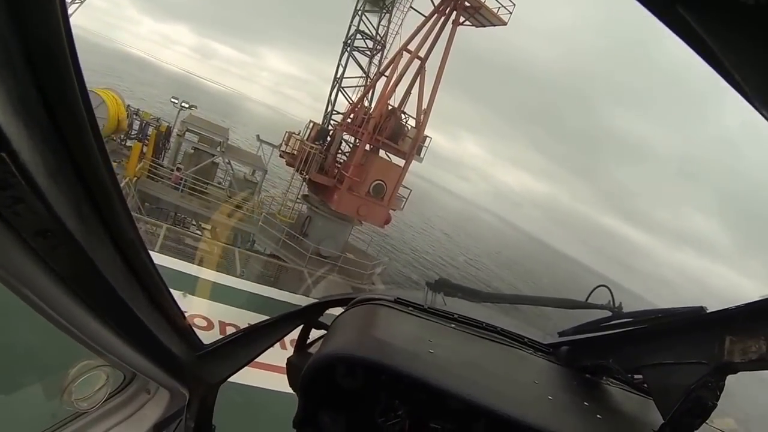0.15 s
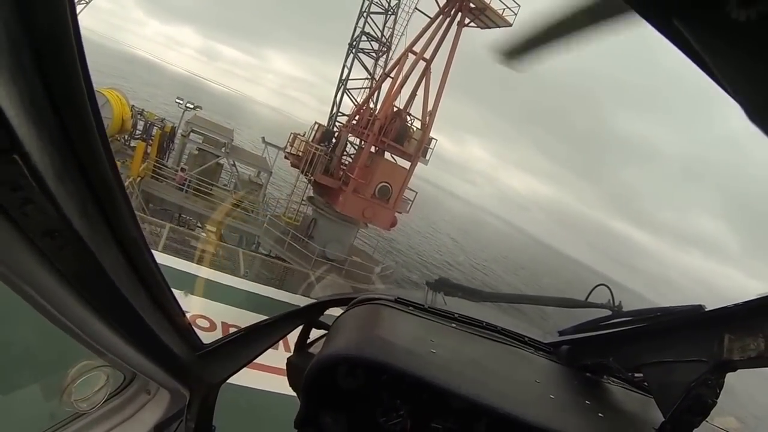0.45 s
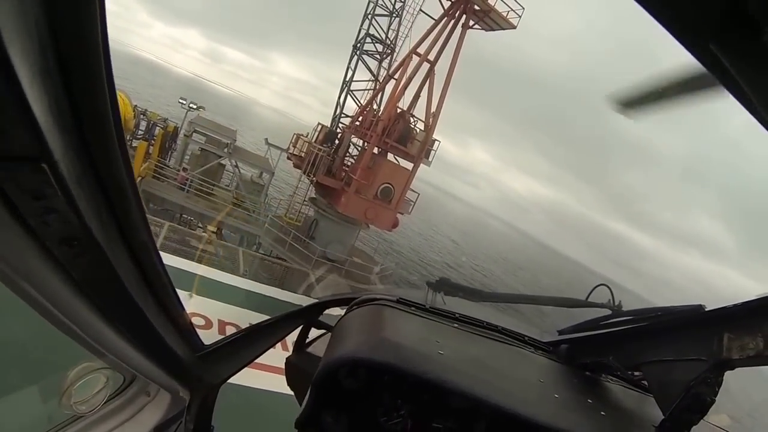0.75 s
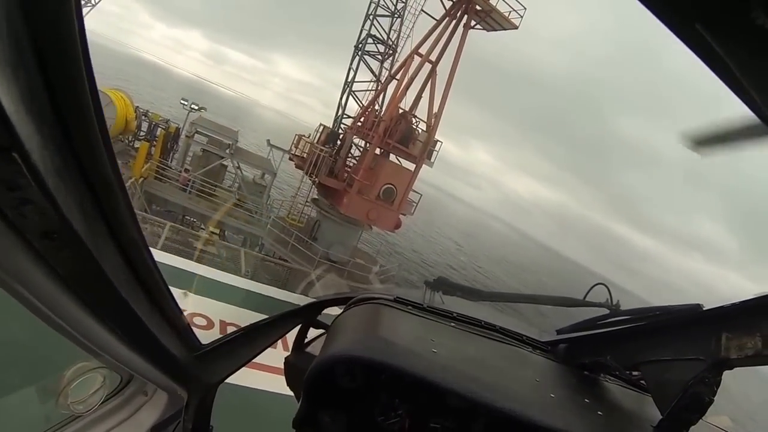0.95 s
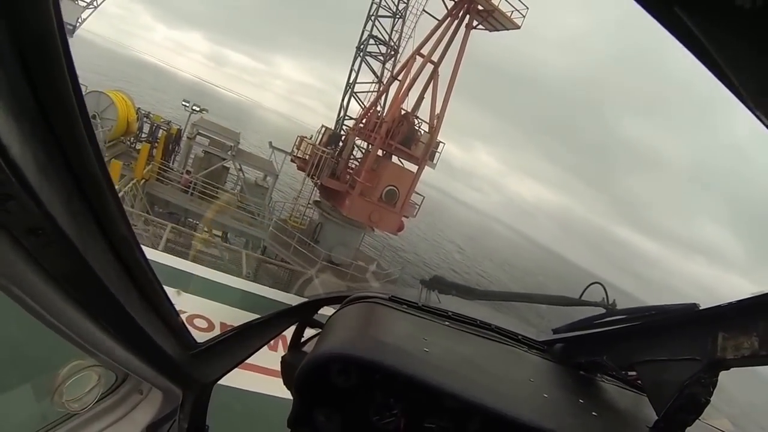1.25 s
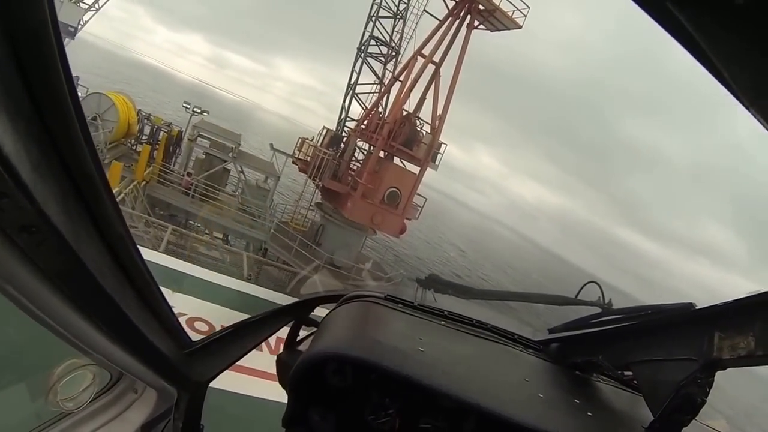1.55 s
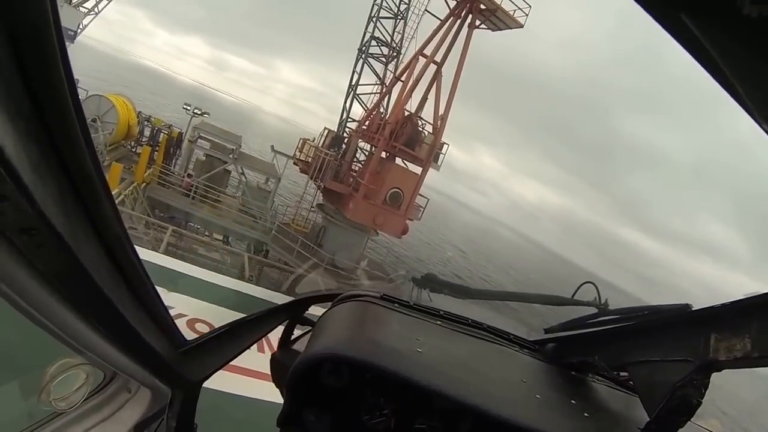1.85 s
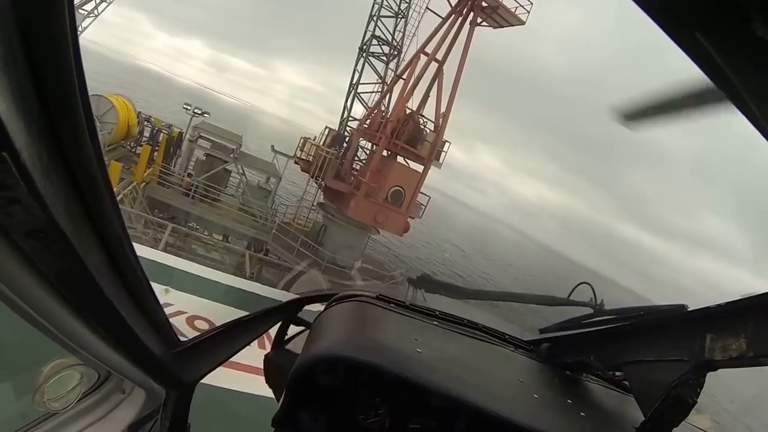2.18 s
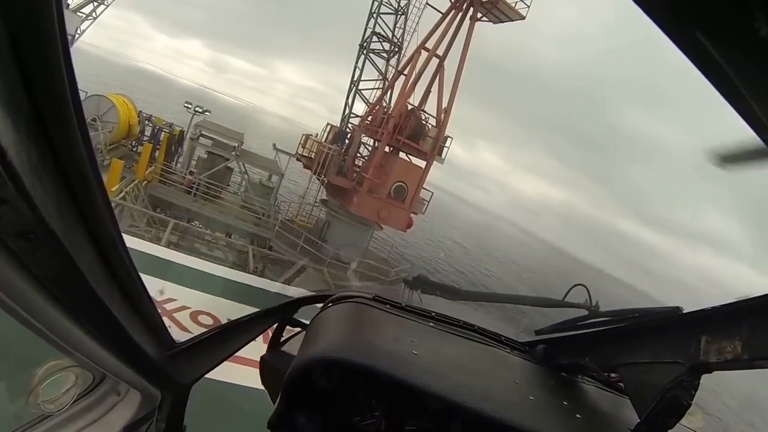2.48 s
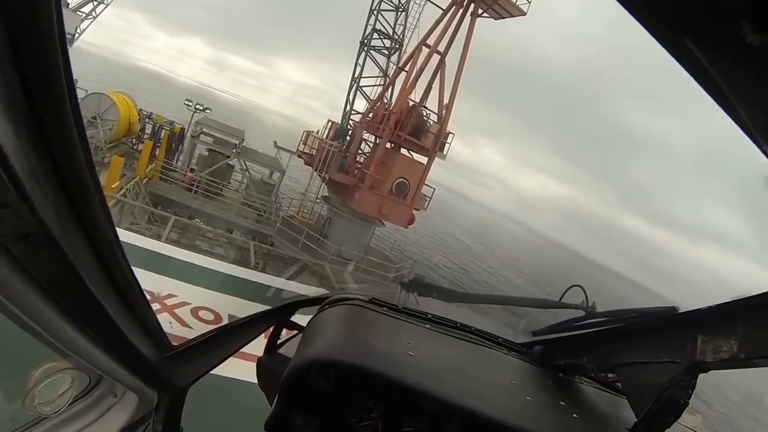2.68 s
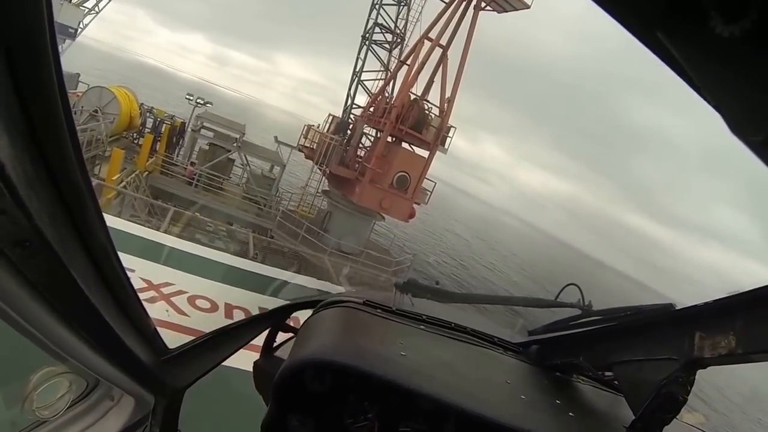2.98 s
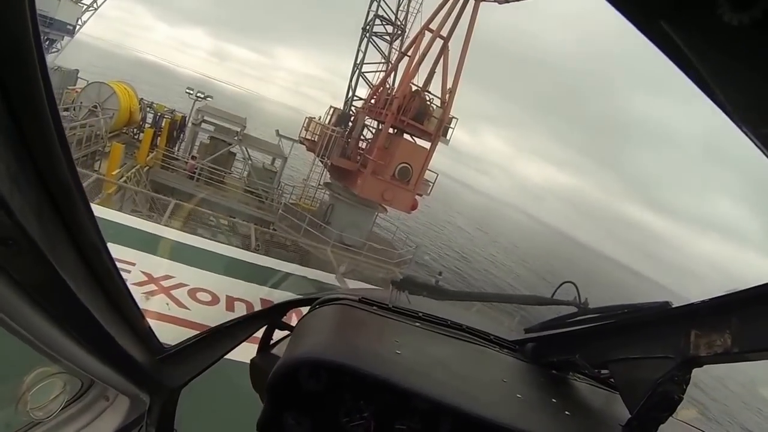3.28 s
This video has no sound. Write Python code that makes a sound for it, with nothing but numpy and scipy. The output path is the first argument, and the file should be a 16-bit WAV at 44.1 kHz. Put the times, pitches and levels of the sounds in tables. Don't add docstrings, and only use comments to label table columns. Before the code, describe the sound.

Steady helicopter drone inside a cockpit: a strong gearbox whine throbs gently with the rotor over low booming air, while the microphone housing ticks and rustles irregularly against its mount.

```python
import sys
import numpy as np
from scipy import signal
from scipy.fft import rfft, irfft
from scipy.io import wavfile
from scipy.ndimage import uniform_filter1d

SR = 44100
rng = np.random.default_rng(int(sys.argv[2]) if len(sys.argv) > 2 else 0)


def to_wav(sig):
    pcm = np.clip(np.atleast_2d(sig), -1, 1) * 32767
    pcm = np.round(pcm).astype(np.int16)
    wavfile.write(sys.argv[1], SR, pcm.T)


def undo_db(level):
    steps = np.asarray(level, float) / 20
    return 10 ** steps


N = 151263
T = np.arange(N) / SR

# (time [s], pitch [Hz])
SHAFT_SPEED = [
    (0, 1211.3),
    (.25, 1212),
    (.6, 1216),
    (.9, 1216.3),
    (1.5, 1219.3),
    (1.9, 1221.3),
    (2.2, 1220.9),
    (2.45, 1219.2),
    (3.2, 1218.1),
    (3.43, 1219),
]
# (time [s], level [dB])
GEAR_LOAD = [
    (0, 2),
    (.5, 0.5),
    (1, 0),
    (1.5, 1),
    (1.9, 2.5),
    (2.3, 0.5),
    (2.8, -0.5),
    (3.43, -0.5),
]
# (time [s], level [dB])
CASING_FLEX = [
    (0, 0.5),
    (.5, 1),
    (.7, -2.5),
    (1, 1.5),
    (1.6, 1),
    (2.05, -2),
    (2.3, -1),
    (3.43, 0.5),
]
# (time [s], level [dB])
RING_PATH_DB = [
    (0, 0),
    (1.3, 0),
    (2.5, -1),
    (2.9, -2),
    (3.43, -7),
]

MESH_HZ, ROTOR_HZ, SHAFT_HZ = 1219.3, 4.85, 71.7
RING_HZ, BEVEL_HZ, PUMP_HZ = 726.3, 883.2, 785.4
MESH_LEVELS = [-25.5, -58, -62.5, -92.5, -82]
RING_LEVELS = [-42.5, -40, -41.5, -45.5, -51.5, -57.5, -73, -70, -95, -84, -92]
BEVEL_LEVELS = [-54, -67, -52]
PUMP_LEVELS = [-60, -40, -63]
SIDE_LEVELS = [-52, -44, -53]
MIX_LEVELS = [-54.5, -50, -62]
OTHER_TONES = [9.68, 107, 131.2, 467, 1178.3, 1257.7, 1506.7, 1613, 1971.6, 2080, 2152, 2295.3, 2334.3,
               2510.6, 2748.8, 3164, 3729.5, 4331.5, 4446.6, 5135.7, 7950]
OTHER_LEVELS = [-31, -35, -34, -51, -53, -45, -49, -50, -59, -57, -51, -60, -58, -66, -61, -66, -58, -69,
                -69, -75, -80]
TONE_THROB = [.06, .15, .04, .05]
MESH_THROB_ANGLE = [-2.2, 2.3, 2.1, -.2]
RING_THROB_DEPTH = ([[.2, .07, .22, .12], [.33, .07, .3, .05]] + [[.09, .1, .03, .05]] * 9)
RING_THROB_ANGLE = ([[1.4, 2.1, 1.1, -2.2], [-3, -.5, -2.6, 1.5], [.3, .8, 1.1, -.5], [1.1, -.9, 2.1, -2.3]]
                     + [[1, -3.1, -.7, -3.1]] * 7)
# (load [dB/dB], flexing [dB/dB], shaft speed [dB/Hz])
RING_RESPONSE = ([(0.88, 0.01, 0.22), (0.87, 0.01, -0.18), (0.11, 0.01, 0.75), (0.011, 2.0, 0.22),
                  (.3, 0.78, -0.092), (0.01, 0.01, 0.85)] + [(.3, 0, 0)] * 5)
PUMP_BEAT_HZ, PUMP_BEAT_PEAK_S, PUMP_BEAT_DEPTH = 0.92, 0.84, 0.23
WANDER_DB, WANDER_PER_S, PHASE_JITTER_RAD = 0.7, 9, 0.06
SWELL_DB, SWELL_PER_S = 0.5, 2.5

WHINE_HZ, WHINE_SAG_HZ_PER_S, WHINE_DB, WHINE_WIDTH_HZ = 10430, 24, -60.5, 270
SKIRT_HZ, SKIRT_WIDTH_HZ, SKIRT_DB, WHINE_CHOP = 10540, 660, -64, 0.24

# (time [s], level [dB])
CLICKS = [(.0593, -39), (.3302, -39), (1.1643, -38), (1.3189, -35), (1.765, -38), (1.8166, -29.5),
          (1.9533, -31), (1.9674, -32), (2.0173, -33), (2.275, -27.5), (3.3496, -30), (3.4022, -34)]
# (pitch [Hz], level [dB], time to fade by 60 dB [s])
PLASTIC_TONES = [(2200, -3, .012), (2800, -1, .012), (3800, 0, .015), (4400, -3, .009), (5100, -2, .011),
                 (6000, -11, .007), (6900, -11, .008)]
TICK_CONTACT_S = 0.0002
# (time [s], level [dB], extra level of the lowest band [dB])
SCRAPES = [(0.2794, -60, 0.0), (0.3262, -49, 5), (0.3404, -54, 3), (0.3674, -55, 5), (0.3844, -59, 4),
           (0.4055, -52, 3), (0.4494, -60, 0), (0.4873, -51, 4), (0.4993, -53, 2), (.53, -58, 2),
           (.6729, -62, 0.0), (.7682, -63, 0.0), (1.1194, -62, 0.0), (1.1644, -54, 4), (1.1894, -59, 0.0),
           (1.255, -60, 0.0), (1.294, -60, 2), (1.3239, -48, 2), (1.3748, -58, 2), (1.6442, -51, 4),
           (1.702, -55, 0.0), (1.7594, -64, 0.0), (1.8103, -59, 2), (1.9864, -62, 3), (2.0433, -61, 0.0),
           (2.138, -62, 2), (2.1934, -47, 1), (2.2144, -59, -4), (2.2503, -54, -2), (2.2987, -60, 0.0),
           (2.3341, -60, 2), (2.366, -46, -3), (2.4064, -50, 2), (2.4528, -62, 0.0), (2.5062, -48, 0),
           (2.5601, -64, 0.0), (2.6105, -54, 0.0), (2.6594, -59, -2), (2.7047, -58, 0.0),
           (2.7347, -59, 0.0), (2.9886, -54, 2), (3.0071, -48, 2), (3.0435, -58, 0.0), (3.07, -59, 0.0),
           (3.1268, -56, -2), (3.4131, -50, 0.0)]
# (pitch [Hz], width [Hz], level [dB])
SCRAPE_BANDS = [(5160, 1440, 3), (8400, 2900, 0.1), (11900, 5900, -2.5)]
# (time [s], level [dB])
CRACKLE = [(0, -69), (.2, -66), (.3, -60), (.55, -68), (.7, -78), (1.05, -76), (1.17, -72), (1.4, -73),
           (1.55, -78), (1.7, -63), (1.9, -71), (2.2, -68), (2.45, -65), (2.75, -69), (2.9, -76),
           (3.05, -67), (3.25, -78), (3.43, -63)]
SCRAPE_ATTACK_S, SCRAPE_DECAY_S, SCRAPE_GRAIN_DB = 0.004, 0.013, 1.5
CRACKLE_PER_S, CRACKLE_SPREAD_DB = 70, 1.2

# (pitch [Hz], level in each Hz [dB])
AIRFLOW = [(8, -49), (90, -59), (230, -58.5), (600, -68), (1050, -75.5), (2500, -79), (6500, -94.5),
           (15000, -116)]
# (pitch [Hz], width [Hz], level [dB])
CABIN_BOOMS = [(14.2, 20.4, -34), (38.4, 15.4, -32.5), (56.5, 7.4, -34), (76.4, 6.7, -39),
               (106, 19.4, -37.5), (128.4, 37, -35), (157.8, 17, -37), (177.6, 20, -39), (206.4, 35, -37.5),
               (245, 21, -46), (306.4, 36, -43), (475, 50, -47.5)]
# (pitch [Hz], width [Hz], level [dB])
SHAKEN_PANELS = [(730, 67, -48), (1201, 90, -43), (1271.7, 86, -35.5), (1489, 176, -37.5),
                 (1581, 290, -38.5), (1940, 63, -58.5), (2145, 290, -46), (2955, 330, -49.5),
                 (3660, 600, -57.5), (4375, 120, -64), (5185, 250, -60.5), (10000, 1800, -65),
                 (12100, 2000, -85), (13800, 700, -90)]
# (time [s], level [dB])
LOW_BUFFET = [(0, -20), (.17, -32.5), (.42, -27), (.55, -34), (1.1, -31), (1.27, -26.5), (1.55, -43),
              (1.7, -23.5), (1.95, -37), (2.6, -26), (2.9, -35), (3.2, -23.5), (3.32, -42), (3.43, -22)]
# (time [s], level [dB])
BLADE_WASH = [(0.0, -26), (0.13, -32.5), (0.3, -25), (0.52, -26), (0.55, -25.5), (0.63, -32.5), (0.7, -28),
              (0.72, -30), (1.28, -26), (1.46, -33.5), (1.48, -26.5), (2.28, -27), (2.36, -35),
              (2.43, -26.5), (2.57, -31.5), (2.61, -25.5), (3.37, -31), (3.43, -26)]
BUFFET_MEAN_DB, BUFFET_TOP_HZ, WASH_MEAN_DB = -31.5, 70, -27.5
GUST_DB, BOOM_FLICKER_DB, PANEL_FLICKER_DB = 0.5, 1.5, 0.8

MIC_TOP_HZ, MIC_LOW_HZ, SOFT_PEAK = 14170, 4, 0.75
GATE_FROM_HZ, GATE_DB, GATE_SCATTER_DB, GATE_BANDS, GATE_BINS = 12500, -105.5, 4.5, 18, 7


def curve(rows):
    return np.interp(T, *np.array(rows, float).T)


def unit(x):
    return x / np.sqrt(np.mean(x ** 2) + 1e-18)


def walk(rate):
    coarse = T[::64]
    k = int(SR / 64 / rate)
    held = np.repeat(rng.standard_normal(len(coarse) // k + 1), k)
    smooth = uniform_filter1d(uniform_filter1d(held, k), k)
    return np.interp(T, coarse, unit(smooth[:len(coarse)]))


def band(x, hz, width_hz):
    edges = [max(hz - width_hz / 2, 2), hz + width_hz / 2]
    return unit(signal.sosfilt(signal.butter(2, edges, btype="band", fs=SR, output="sos"), x))


def strikes(rows):
    x = np.zeros(N)
    for s, db in rows:
        x[int(s * SR)] += undo_db(db)
    return x


def harmonics(hz, levels):
    return hz * np.arange(1, len(levels) + 0.5)


def tones(turn, hz, levels, throb, angles=None, follows=None):
    out = 0
    controls = np.array([curve(GEAR_LOAD), curve(CASING_FLEX), curve(SHAFT_SPEED) - MESH_HZ])
    depths = np.broadcast_to(throb, (len(levels), 4))
    for n, (f, db) in enumerate(zip(hz, levels)):
        start = 2 * np.pi * rng.random(5)
        angle = angles[n] if angles else start
        beat = 1
        for k, depth in enumerate(depths[n]):
            beat = beat + depth * np.cos(2 * np.pi * (k + 1) * ROTOR_HZ * turn + angle[k])
        phase = 2 * np.pi * f * turn + start[4] + PHASE_JITTER_RAD * walk(24.73)
        drift_db = WANDER_DB * walk(WANDER_PER_S)
        if np.mean(db) < -35:
            drift_db = drift_db + SWELL_DB * walk(SWELL_PER_S)
        if follows:
            drift_db = drift_db + np.dot(follows[n], controls)
        out = out + undo_db(db + drift_db) * beat * np.sqrt(2) * np.sin(phase)
    return out


def gearbox(turn):
    mesh = tones(turn, harmonics(MESH_HZ, MESH_LEVELS), MESH_LEVELS, TONE_THROB,
                 [MESH_THROB_ANGLE] * len(MESH_LEVELS))
    sides = tones(turn, MESH_HZ + SHAFT_HZ * np.array([-1, 1, 2]), SIDE_LEVELS, TONE_THROB)
    ring_levels = [RING_LEVELS[0] + curve(RING_PATH_DB)] + RING_LEVELS[1:]
    ring = tones(turn, harmonics(RING_HZ, RING_LEVELS), ring_levels, RING_THROB_DEPTH,
                 RING_THROB_ANGLE, RING_RESPONSE)
    mixed = tones(turn, MESH_HZ + RING_HZ * np.array([-1, 1, 2]), MIX_LEVELS, TONE_THROB)
    pumps = tones(turn, harmonics(PUMP_HZ, PUMP_LEVELS), PUMP_LEVELS, TONE_THROB)
    pump_beat = 1 + PUMP_BEAT_DEPTH * np.cos(2 * np.pi * PUMP_BEAT_HZ * (T - PUMP_BEAT_PEAK_S))
    bevel = tones(turn, harmonics(BEVEL_HZ, BEVEL_LEVELS), BEVEL_LEVELS, TONE_THROB)
    others = tones(turn, OTHER_TONES, OTHER_LEVELS, TONE_THROB)
    return (mesh + sides) * undo_db(curve(GEAR_LOAD)) + ring + mixed + pumps * pump_beat + bevel + others


def turbine(turn):
    blur = band(rng.standard_normal(N), WHINE_WIDTH_HZ / 4, WHINE_WIDTH_HZ / 2)
    pitch = WHINE_HZ - WHINE_SAG_HZ_PER_S * T
    whistle = np.sqrt(2) * blur * np.sin(2 * np.pi * np.cumsum(pitch) / SR)
    skirt = band(rng.standard_normal(N), SKIRT_HZ, SKIRT_WIDTH_HZ)
    chop = 1 + WHINE_CHOP * np.cos(2 * np.pi * 4 * ROTOR_HZ * turn + 1.0)
    return chop * undo_db(0.4 * walk(30)) * (undo_db(WHINE_DB) * whistle + undo_db(SKIRT_DB) * skirt)


def ticks():
    t = T[:1500]
    ring = 0
    for hz, db, t60 in PLASTIC_TONES:
        ring = ring + undo_db(db) * np.exp(-np.log(1000) * t / t60) * np.sin(2 * np.pi * hz * t)
    contact = (1 - np.exp(-t / TICK_CONTACT_S)) ** 2
    return signal.fftconvolve(strikes(CLICKS), ring * contact)[:N]


def rustles():
    t = T[:4000]
    shape = (1 - np.exp(-t / SCRAPE_ATTACK_S)) * np.exp(-t / SCRAPE_DECAY_S)
    chance = rng.random((2, N))
    crackle_db = curve(CRACKLE) - CRACKLE_SPREAD_DB * np.log(chance[1] + 1e-9)
    crackle = (chance[0] < CRACKLE_PER_S / SR) * undo_db(crackle_db)
    grains = rng.standard_normal(N) * undo_db(SCRAPE_GRAIN_DB * rng.exponential(size=N))
    low, mid, high = (undo_db(db) * band(grains, hz, w) for hz, w, db in SCRAPE_BANDS)
    low_hits = strikes([(s, db + low_db) for s, db, low_db in SCRAPES])
    high_hits = strikes([(s, db) for s, db, _ in SCRAPES])
    low_swell = signal.fftconvolve(low_hits + crackle, shape)[:N]
    high_swell = signal.fftconvolve(high_hits + crackle, shape)[:N]
    return low_swell * low + high_swell * (mid + high)


def shaken(rows, flicker_db):
    out = 0
    for hz, width_hz, db in rows:
        out = out + undo_db(db + flicker_db * walk(6.55)) * band(rng.standard_normal(N), hz, width_hz)
    return out


def cabin():
    f = np.maximum(np.fft.rfftfreq(N, 1 / SR), 1)
    air_hz, air_db = np.array(AIRFLOW).T
    per_hz = undo_db(np.interp(np.log(f), np.log(air_hz), air_db))
    air = irfft(rfft(rng.standard_normal(N)) * per_hz * np.sqrt(SR / 2), N)
    low = shaken([b for b in CABIN_BOOMS if b[0] < BUFFET_TOP_HZ], BOOM_FLICKER_DB)
    high = shaken([b for b in CABIN_BOOMS if b[0] >= BUFFET_TOP_HZ], BOOM_FLICKER_DB)
    booms = low * undo_db(curve(LOW_BUFFET) - BUFFET_MEAN_DB) + high * undo_db(curve(BLADE_WASH) - WASH_MEAN_DB)
    panels = shaken(SHAKEN_PANELS, PANEL_FLICKER_DB) * undo_db(curve(GEAR_LOAD) / 2)
    return (air + booms) * undo_db(GUST_DB * walk(4.03)) + panels


def scene():
    turn = np.cumsum(curve(SHAFT_SPEED)) / MESH_HZ / SR
    return (gearbox(turn) + turbine(turn) + ticks() + rustles() + cabin())[None]


def drop_faint_treble(x):
    f, _, z = signal.stft(x, SR, nperseg=2048)
    first = np.searchsorted(f, GATE_FROM_HZ)
    bins = slice(first, first + GATE_BANDS * GATE_BINS)
    top = z[:, bins].reshape(len(x), GATE_BANDS, GATE_BINS, -1)
    size = np.sqrt(np.mean(np.abs(top) ** 2, axis=2, keepdims=True))
    keep = size > undo_db(GATE_DB + GATE_SCATTER_DB * rng.standard_normal(size.shape))
    z[:, bins] = (top * keep).reshape(z[:, bins].shape)
    return signal.istft(z, SR, nperseg=2048)[1][:, :N]


def band_limit(x):
    return signal.sosfilt(signal.butter(12, 15130, fs=SR, output="sos"), x)


def record(dry):
    soft = SOFT_PEAK * np.tanh(dry / SOFT_PEAK)
    dull = signal.sosfilt(signal.butter(12, MIC_TOP_HZ, fs=SR, output="sos"), soft)
    steady = signal.sosfilt(signal.butter(2, MIC_LOW_HZ, btype="high", fs=SR, output="sos"), dull)
    mix = drop_faint_treble(steady)
    return band_limit(mix)


dry = scene()
out = record(dry)
to_wav(out)
```